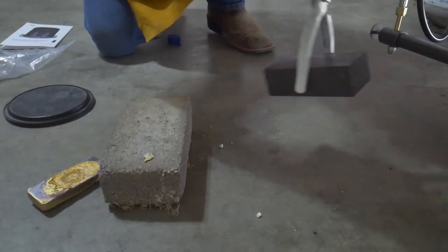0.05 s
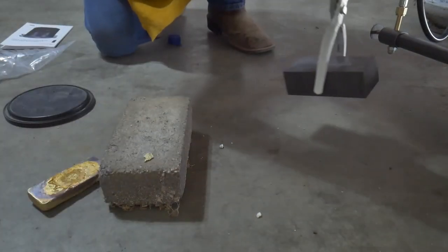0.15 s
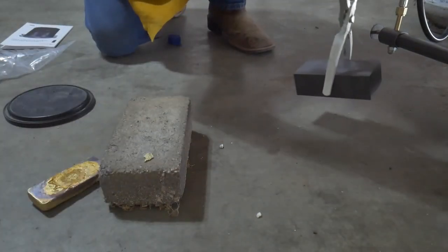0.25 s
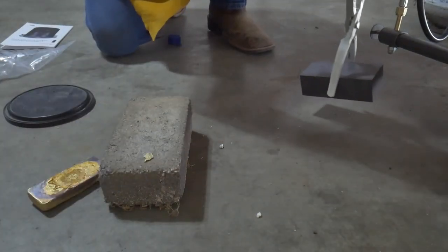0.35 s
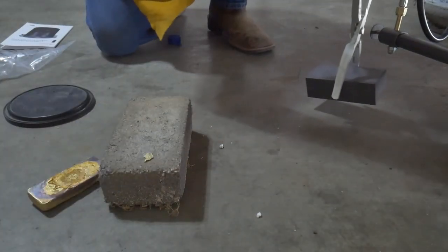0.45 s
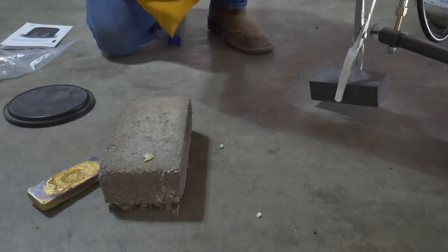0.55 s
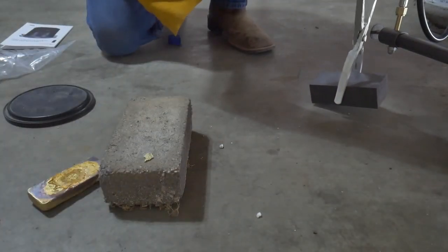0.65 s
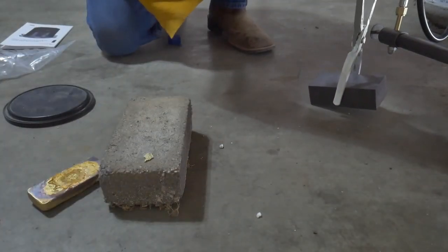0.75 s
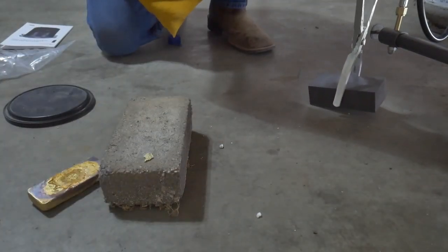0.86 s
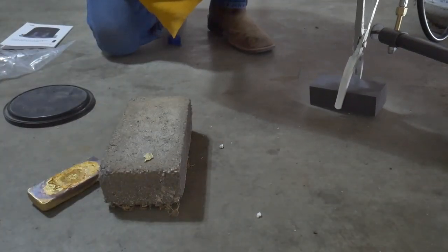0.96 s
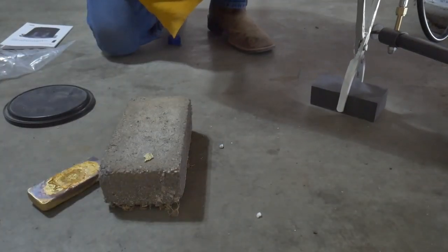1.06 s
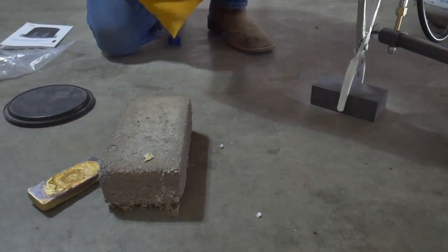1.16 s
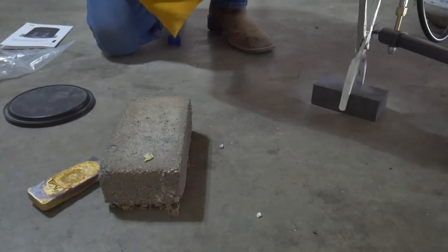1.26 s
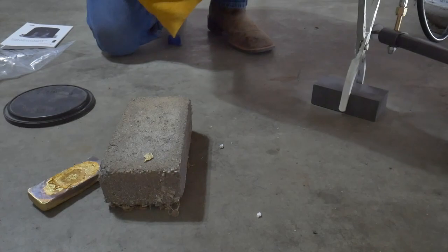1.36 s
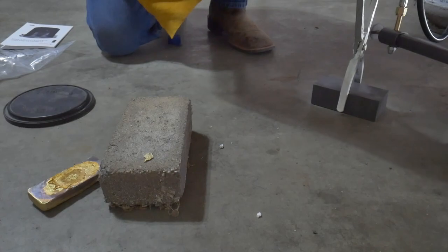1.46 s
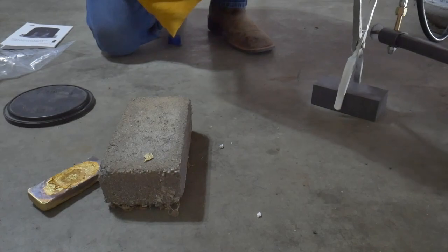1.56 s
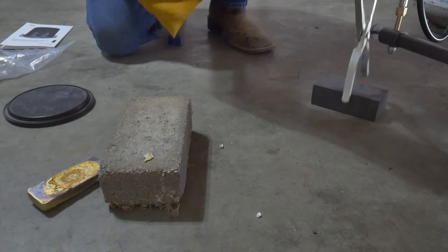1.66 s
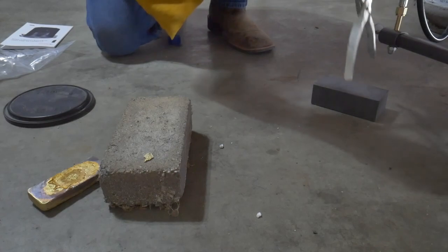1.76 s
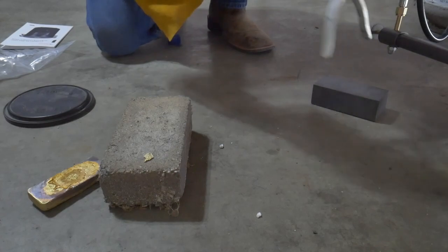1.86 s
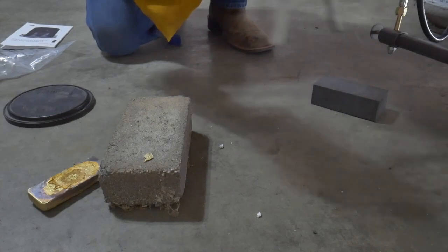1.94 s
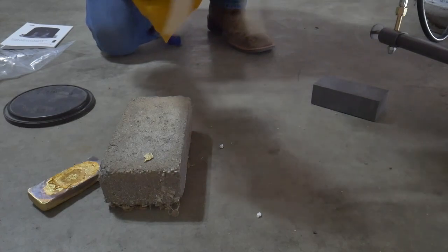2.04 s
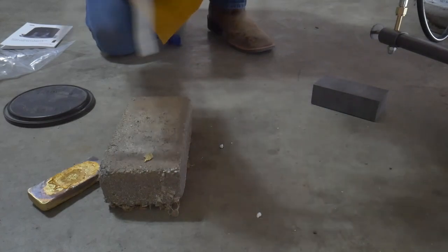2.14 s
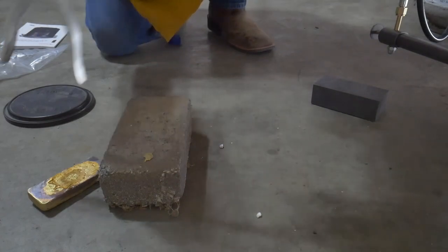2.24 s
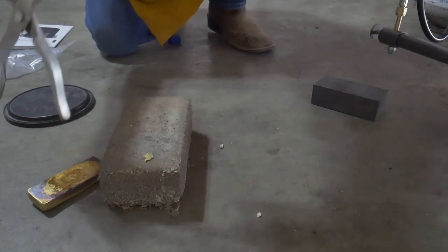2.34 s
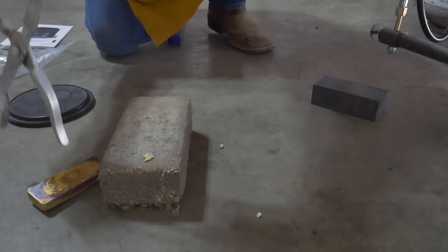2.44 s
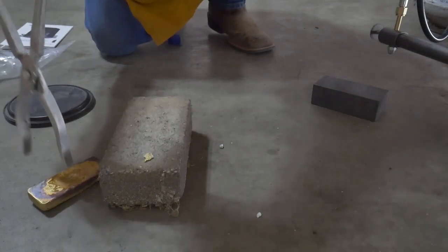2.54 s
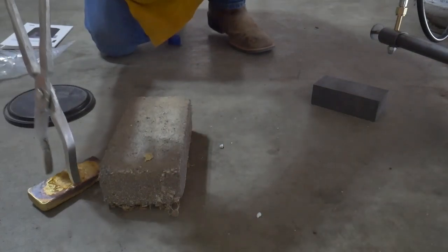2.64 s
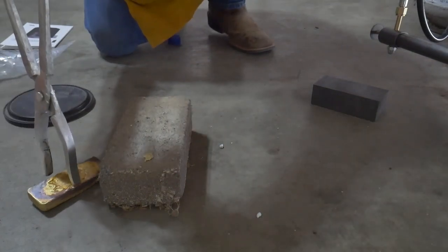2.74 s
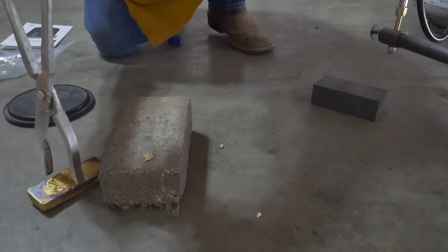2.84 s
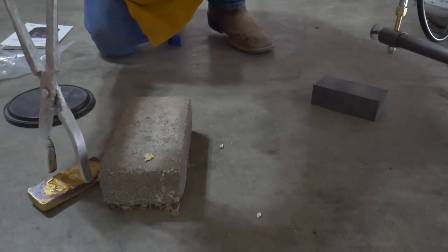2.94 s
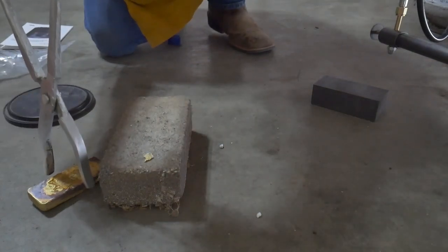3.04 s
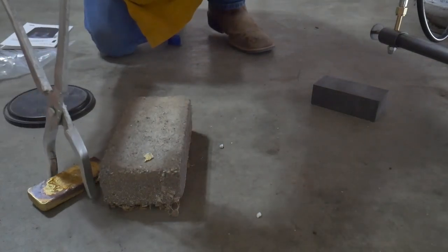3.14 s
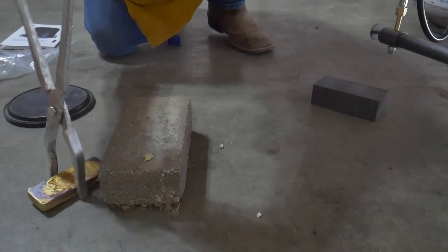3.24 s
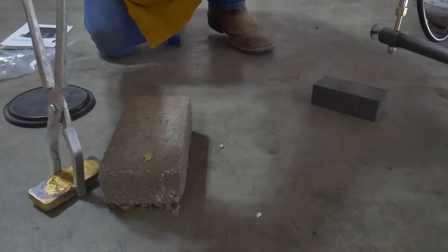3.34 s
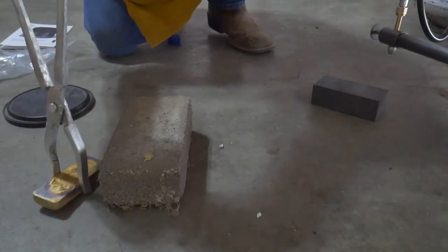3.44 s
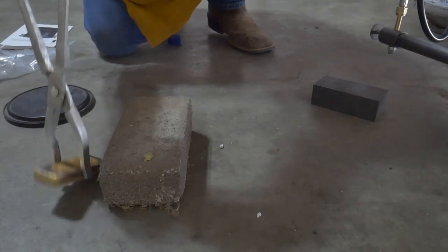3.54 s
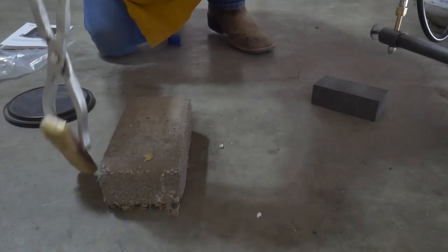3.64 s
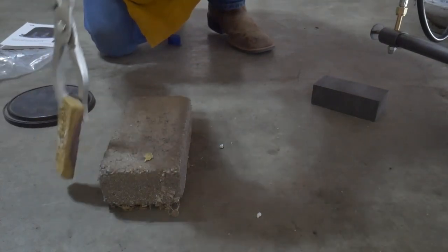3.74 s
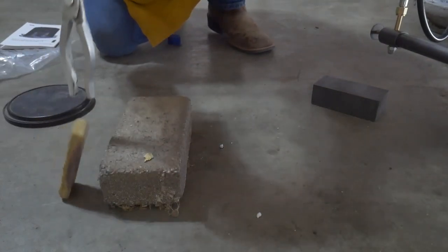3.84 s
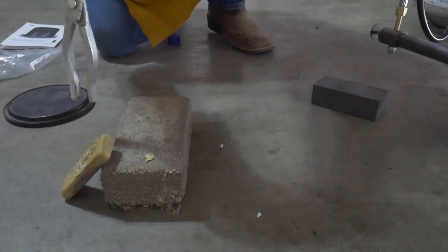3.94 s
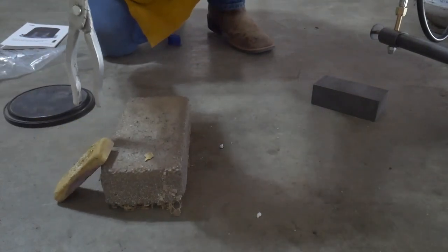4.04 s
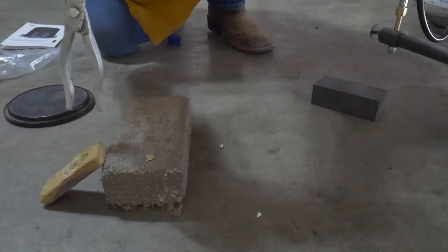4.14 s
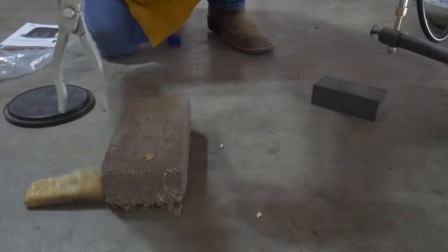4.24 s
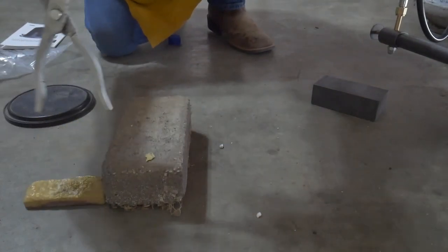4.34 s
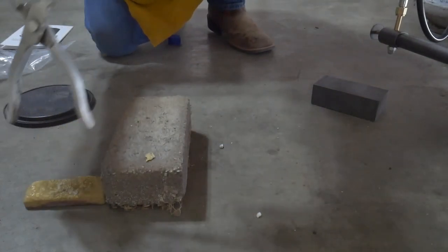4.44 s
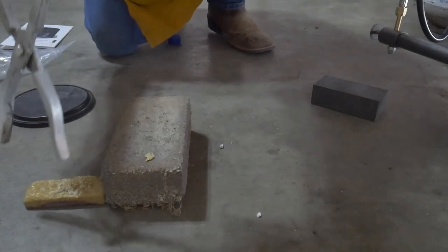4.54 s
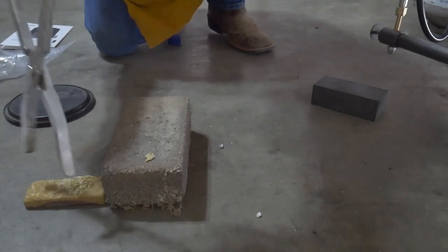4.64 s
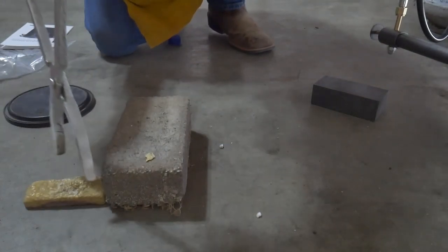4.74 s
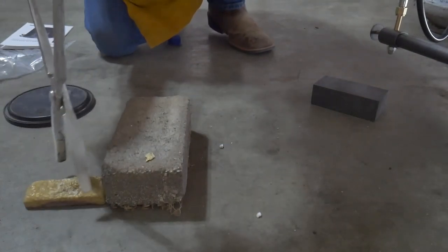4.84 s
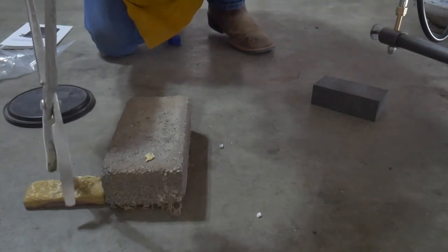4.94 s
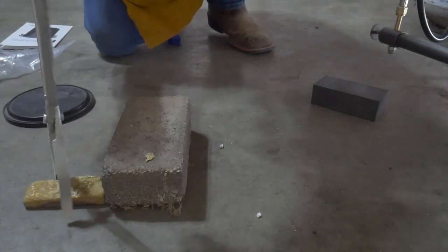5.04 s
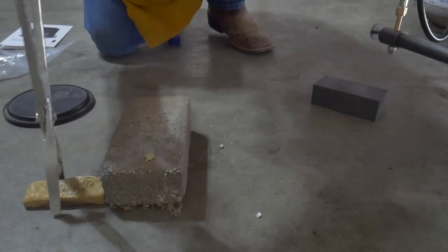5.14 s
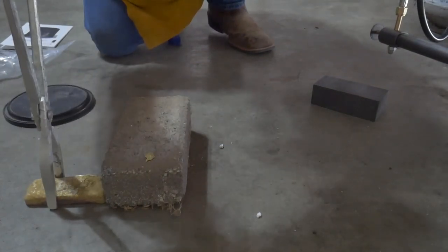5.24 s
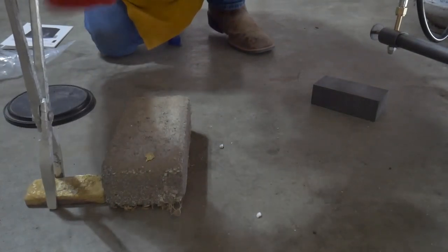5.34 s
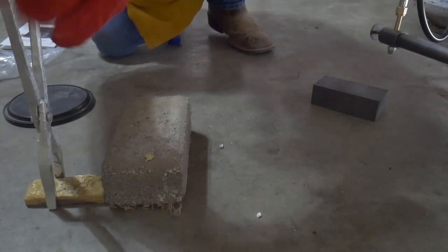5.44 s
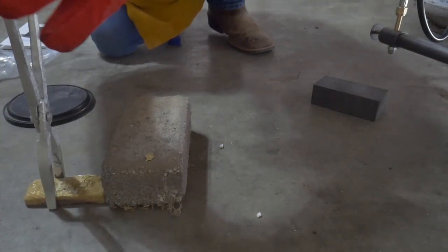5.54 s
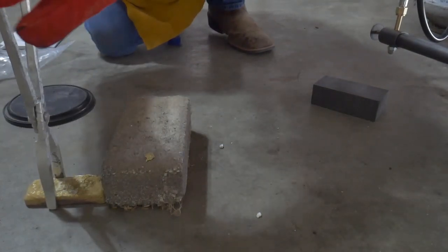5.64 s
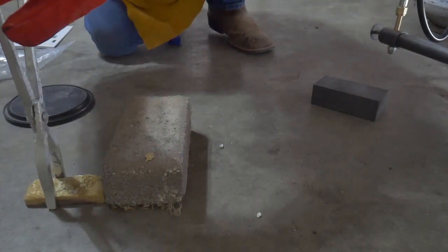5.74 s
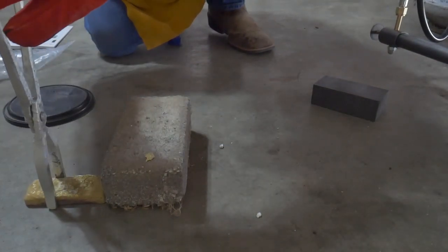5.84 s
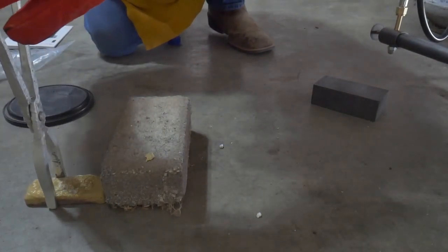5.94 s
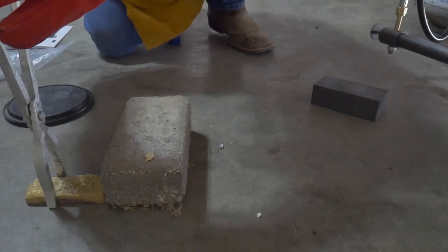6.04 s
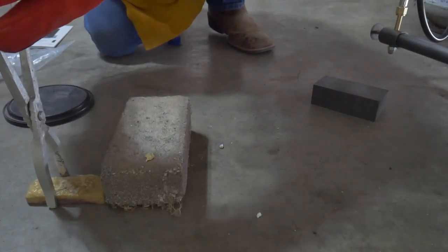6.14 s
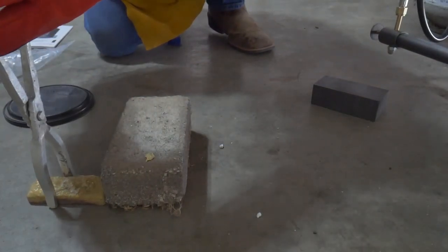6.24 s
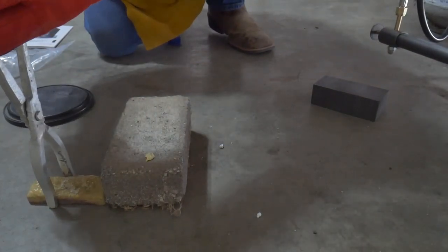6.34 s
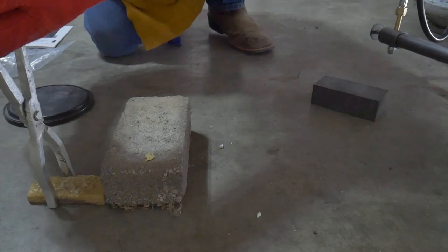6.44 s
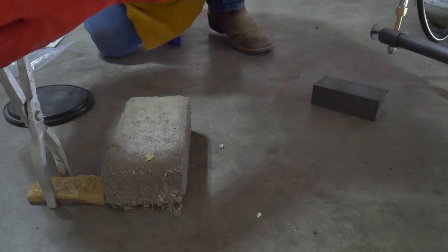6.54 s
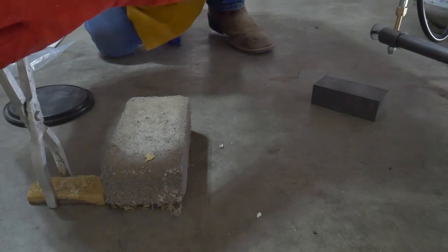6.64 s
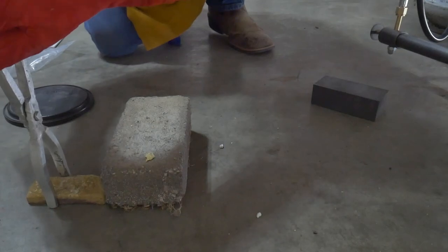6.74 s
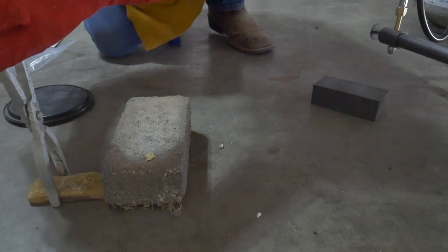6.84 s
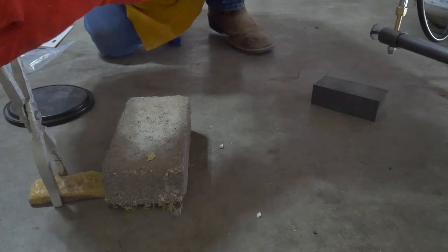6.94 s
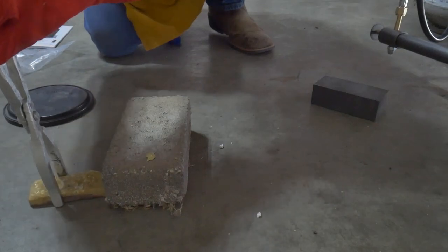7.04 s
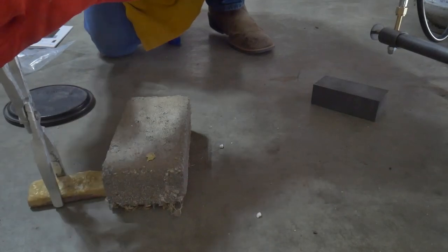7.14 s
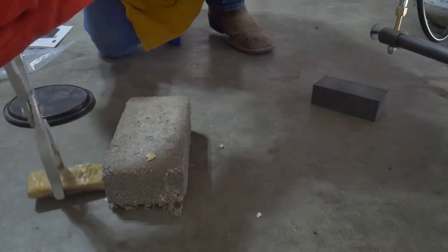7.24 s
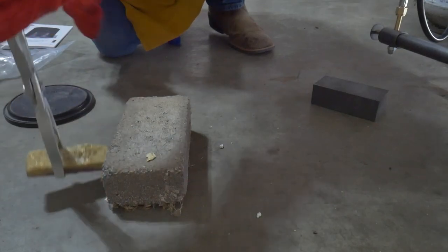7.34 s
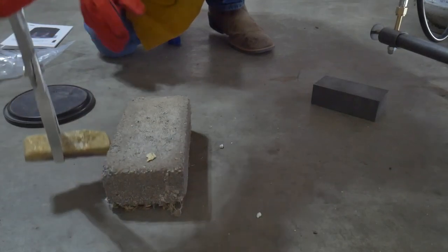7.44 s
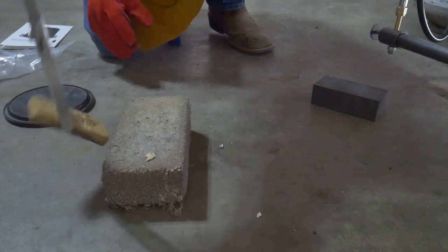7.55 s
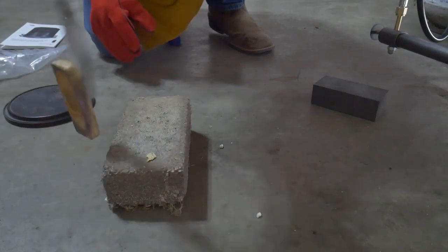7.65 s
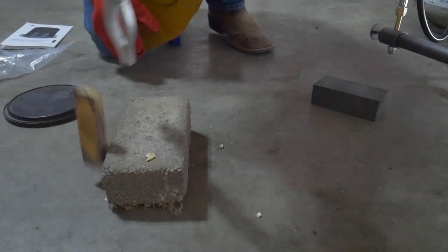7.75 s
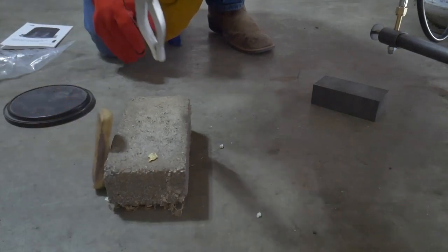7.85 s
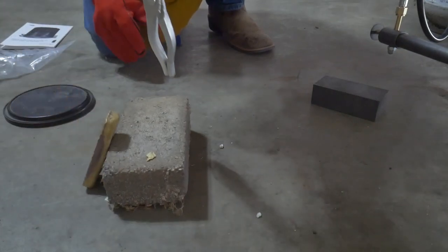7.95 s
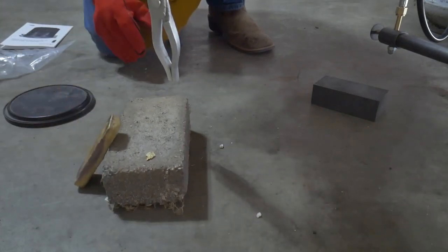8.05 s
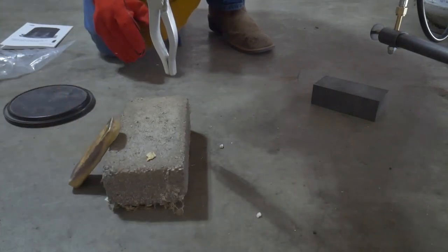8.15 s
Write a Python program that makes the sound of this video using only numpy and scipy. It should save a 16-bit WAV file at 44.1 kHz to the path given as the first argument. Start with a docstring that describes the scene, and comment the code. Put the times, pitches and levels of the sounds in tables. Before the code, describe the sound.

Quiet air rumble and faint cloth rustle, then a metal block set down on concrete: faint edge touch, solid clunk. Steel tongs snap several times around a bar, which bumps a brick dully and slaps down hard. More clacks and a short scrape, a near-quiet hold with faint ticks, then bright jaw clatter, metallic rasp and a ringing drop. Near, central sound in a reverberant concrete room.

```python
"""Tongs, block and bar in a workshop

In a workshop with a concrete floor, steel tongs set a cast metal block down, then clamp a small metal bar.
The bar is tipped against a brick, falls flat, is gripped again, rasps out of the jaws and lands ringing.
Blows mix a knock, a noisy crack and fading tones of the struck object; rubbing is noise built from tiny slips.
Sleeves rustle, grit ticks, dull bumps sound, and the hard room answers over a ventilation rumble."""
import sys
import numpy as np
from scipy import signal
from scipy.fft import rfft, irfft
from scipy.io import wavfile
from scipy.ndimage import uniform_filter1d

SR = 44100
rng = np.random.default_rng(int(sys.argv[2]) if len(sys.argv) > 2 else 0)


def transcribe(u):
    """Save the signal u as a 16-bit wav file named by the first command-line argument.

    u: samples, shape (n,) or (channels, n), limited to [-1, 1]; the rate is SR.
    q: integer samples, one column per channel.
    """
    v = np.clip(np.atleast_2d(u).T, -1, 1)
    q = np.round(v * 32767).astype(np.int16)
    wavfile.write(sys.argv[1], SR, q)


N = 361179
T = np.arange(N) / SR
LEFT_RIGHT = np.array([[1], [-1]])  # puts a sound on both sides with opposite sign


def undb(db):
    """Decibels to gain."""
    return 10 ** (np.asarray(db) / 20)


def fade(t, t60):
    """Exponential decay, 60 dB down after t60 seconds."""
    return np.exp(-np.log(1000) * t / t60)


def unit(x):
    """Scale to rms 1."""
    return x / np.sqrt(np.mean(x ** 2))


def add(track, s, sound):
    """Mix a sound into the track, starting at s seconds."""
    i = int(s * SR)
    track[i:i + len(sound)] += sound[:N - i]


def colour(x, points):
    """Shape a sound by a spectrum of (Hz, dB) points, then scale it to rms 1."""
    hz, db = np.transpose(points)
    f = np.maximum(np.fft.rfftfreq(len(x), 1 / SR), 1)
    gain = undb(np.interp(np.log(f), np.log(hz), db))
    return unit(irfft(rfft(x) * gain, len(x)))


def crack(centre_hz, t60, octaves):
    """A short burst of micro-impacts as two rough faces meet; harder contact, higher band."""
    t = np.arange(SR // 20) / SR
    f = np.maximum(np.fft.rfftfreq(len(t), 1 / SR), 1)
    away = np.log2(f / centre_hz) / octaves
    noise = irfft(rfft(rng.standard_normal(len(t))) * np.exp(-away ** 2 / 2), len(t))
    return 0.42 * unit(noise) * fade(t, t60)


def knock(hz, cycles, soft=5.9):
    """The air pulse of a mass stopped short: swings of pressure, rounded by the contact time."""
    t = np.arange(SR // 20) / SR
    band = [0.26 * hz, min(soft * hz, SR / 3)]
    contact = signal.butter(2, band, "band", fs=SR, output="sos")
    pulse = np.sin(2 * np.pi * hz * t) * fade(t, cycles / hz)
    return 1.815 * signal.sosfilt(contact, pulse)


def ring(modes, flat, held_t60):
    """Decaying tones, weighted by where the blow lands; whatever touches the object adds its own damping."""
    hz, edge_db, flat_db, free_t60 = np.transpose(modes)
    t60 = 1 / (1 / free_t60 + 1 / held_t60)
    t = np.arange(int(min(t60.max(), 1) * SR)) / SR
    db = edge_db + np.clip(flat, 0, 1) * (flat_db - edge_db)
    phase = 2 * np.pi * rng.random((len(hz), 1))
    tones = np.sin(2 * np.pi * hz[:, None] * t + phase) * fade(t, t60[:, None])
    swell = 1 - fade(t, 0.002)
    return undb(db) @ tones * swell


def strike(hits, modes, cycles, crack_t60, crack_octaves):
    """Blows on one object: rows are the direct sound and the share that goes into the room."""
    direct, sent = np.zeros((2, N))
    for s, knock_db, knock_hz, crack_db, crack_hz, ring_db, held_t60, room_db, flat in hits:
        parts = (undb(knock_db) * knock(knock_hz, cycles),
                 undb(crack_db) * crack(crack_hz, crack_t60, crack_octaves),
                 undb(ring_db) * ring(modes, flat, held_t60))
        for part in parts:
            add(direct, s, part)
            add(sent, s, undb(room_db) * part)
    return np.array([direct, sent])


def effort(strokes):
    """Each stroke of a movement swells to its fastest moment and eases off; gain over time."""
    drop_db = 21  # how far the level is down one rise time before, or one fall time after
    roundness = 1.9  # 1 = pointed, 2 = bell
    power = np.zeros(N)
    for s, db, rise, fall in strokes:
        away = np.minimum(np.maximum((s - T) / rise, (T - s) / fall), 5)
        power += undb(db - drop_db * away ** roundness) ** 2
    return np.sqrt(power)


def rub(strokes, spectrum, slips_per_s, catch_db):
    """Friction: tiny slips that catch and free every few milliseconds, as loud as the stroke is fast."""
    slips = (rng.random(N) < slips_per_s / SR) * rng.standard_normal(N)
    catch = unit(uniform_filter1d(rng.standard_normal(N), size=300))
    return colour(slips * undb(catch_db * catch), spectrum) * effort(strokes)


def bar():
    """The bar hits floor and brick, rocks and rings high; the flatter it lands, the brighter the slap."""
    # Tones of the small bar. Each row: pitch in Hz, level in dB struck on an end,
    # level in dB struck flat, free fade time (t60) in seconds.
    modes = [(4137, 0, -8, .8), (5670, -7, -9, .7), (10594, -22, -6, .7), (11965, -26, 0, .55),
             (4180, -20, -20, .5), (4700, -22, -26, .15), (8166, -42, -28, .2), (9040, -24, -12, .45),
             (15510, -42, -25, .3)]
    # Blows and rebounds. Each row: start in seconds, knock level in dB, knock pitch in Hz, crack level in dB,
    # ring level in dB, fade time (t60) in seconds the contact allows, flat share 0-1.
    blows = [(3.777, -38, 900, -29, -33, 3.3, 0.2), (3.876, -1.5, 521, -7, -15.5, 0.2, 0.21),
             (3.904, -11, 1400, -23, -18, 0.45, 0.46), (3.9984, -1.5, 900, -3, -17, 0.3, 0.1),
             (4.245, -19, 305, -48, -32, 3.6, 0), (4.3356, -10.5, 309, -0.5, -2, 0.052, 0.91),
             (4.338, -10, 1290, -18, -26, 0.9, 0.48), (7.8588, -3.5, 720, -4, -4, 0.063, 0.1),
             (7.863, -19, 1500, -40, -17.5, 4.3, 0), (7.919, -16, 470, -20, -13, 0.36, 0),
             (7.975, -11, 1350, -42, -22.5, 5.2, 0), (8.07, -14, 1230, -37, -21.5, 0.26, 0)]
    end_crack_hz, flat_crack_hz = 1250, 5600
    end_room_db, flat_room_db = -3, -8.0  # flat blows are given less room
    hits = []
    for s, knock_db, knock_hz, crack_db, ring_db, held_t60, flat in blows:
        crack_hz = end_crack_hz * (flat_crack_hz / end_crack_hz) ** flat
        room_db = end_room_db + flat * (flat_room_db - end_room_db)
        hits.append((s, knock_db, knock_hz, crack_db, crack_hz, ring_db, held_t60, room_db, flat))
    return strike(hits, modes, cycles=2.37, crack_t60=0.012, crack_octaves=0.42)


def tongs(knock_hz=1200, ring_db=-2.0, room_db=-8.5, graze_hz=5000, graze_db_per_octave=-19):
    """Clamping shakes the whole arms, a tap only the tips; the hand damps both quickly."""
    # Tones of the tongs. Each row: pitch in Hz, level in dB when a tip taps,
    # level in dB when the jaws clamp flat, free fade time (t60) in seconds.
    modes = [(243, -10, -18.5, .05), (756, -10, -12, 0.069), (1100, -21, -13.5, 0.061),
             (1406, -13.5, 0, 0.081), (1620, -13, -1.5, 0.037), (2086, -10.5, -5.5, 0.024),
             (2475, -17.5, 1.5, 0.24), (3040, -21.5, -4, .07), (3733, -15, -1, 0.27),
             (4320, -2.5, -21, 0.073), (4660, -2.5, -18, 0.06), (4990, -14, -4.5, 0.033),
             (5330, -13.5, -6.5, 0.28), (6150, -16.5, -10.5, 0.44), (6640, -11, -13, .12),
             (7930, -27.5, -12.5, 0.049), (8800, -15, 2.5, 0.36), (8600, -14, -20.5, 0.12),
             (9880, -23, -25.5, 0.11), (11370, -17.5, -14, .12), (12070, -12.5, -14, .12),
             (13400, -21.5, -21, .08), (15100, -23, -29, .1)]
    # Clacks. Each row: start in seconds, crack level in dB, crack pitch in Hz, knock level in dB,
    # fade time (t60) in seconds the hand allows, flat share 0-1.
    clacks = [(2.724, -5, 4100, -18.5, .028, 0.03), (3.213, -6, 1870, -6, 0.028, 0.56),
              (3.2143, -8.5, 10300, -28, 0.044, .3), (3.331, -25, 1500, -22, 0.046, 0.7),
              (3.337, -23, 2500, -13.5, .06, 0.67), (3.353, -5.5, 5110, -15, 0.038, 0.06),
              (5.1043, -7.5, 3450, -11, 0.019, 1), (5.107, -6, 6500, -24, .12, 0.47),
              (5.297, -15.5, 6540, -32, .03, 0.5), (5.500, -17, 10140, -18, .04, 1),
              (6.671, -38.5, 4000, -36.5, .03, 0.48), (6.927, -45, 3000, -25, .1, 0.21),
              (7.668, -46, 1700, -20, 0.026, 0.8), (7.6831, -23.5, 3170, -8, 0.019, 0.3),
              (7.7094, -8.5, 3500, -7.5, 0.074, 0.66), (7.728, -8, 9050, -29, 0.12, 0.4),
              (7.7415, -0.5, 10100, -37, .03, 0.4), (7.78, -8, 9250, -39, .06, 0.34)]
    hits = []
    for s, crack_db, crack_hz, knock_db, held_t60, flat in clacks:
        # the ring follows the crack, but a bright graze hardly rings
        octaves_above = max(np.log2(crack_hz / graze_hz), 0)
        clack_ring_db = crack_db + ring_db + graze_db_per_octave * octaves_above
        hits.append((s, knock_db, knock_hz, crack_db, crack_hz, clack_ring_db, held_t60, room_db, flat))
    return strike(hits, modes, cycles=4.6, crack_t60=0.026, crack_octaves=0.75)


def block(knock_hz=830, crack_hz=2160, room_db=-7.5):
    """The block touches down on an edge, then drops flat."""
    # Tones of the cast block. Each row: pitch in Hz, level in dB struck on an edge,
    # level in dB struck flat, free fade time (t60) in seconds.
    modes = [(810, -23, -13, 0.035), (1084, 4.5, -27, 0.11), (1605, -17, 2.5, 0.85), (1580, -17, -22, 0.35),
             (2270, -22, -6.5, 0.044), (2924, 1, -11.5, 0.31), (3710, -17, -11.5, 0.23),
             (3840, -18, -18, 0.087), (4720, -19, -18, 0.2), (5420, -13.5, -37, 0.7),
             (6540, -19, -15, 0.11), (7400, -34, -24, 0.25), (7730, -39, -29, 0.35),
             (9160, -29, -28.5, 0.32), (10400, -29, -43, 0.32), (11970, -40, -43, 0.41),
             (14500, -30, -37, 0.26)]
    # Blows. Each row: start in seconds, knock level in dB, crack level in dB, ring level in dB,
    # fade time (t60) in seconds the contact allows, flat share 0-1.
    blows = [(1.119, -18, -42, -23.5, 0.16, 0.13), (1.2525, -6, -16, -17, 1.3, 1)]
    hits = [(s, knock_db, knock_hz, crack_db, crack_hz, ring_db, held_t60, room_db, flat)
            for s, knock_db, crack_db, ring_db, held_t60, flat in blows]
    return strike(hits, modes, cycles=12.0, crack_t60=0.03, crack_octaves=0.96)


def brick(contact_t60=0.12, room_db=-2):
    """The porous brick answers a bump of the bar with a dull, very short clunk."""
    # Tones of the brick. Each row: pitch in Hz, level in dB struck on an edge,
    # level in dB struck flat, free fade time (t60) in seconds.
    modes = [(614, -5, -5.5, 0.012), (840, -3.5, 1, 0.016), (1150, -1.5, -0.5, 0.014),
             (1395, -1, -3, 0.017), (1840, -10.5, -7, 0.017)]
    # Bumps. Each row: start in seconds, level in dB, flat share 0-1.
    blows = [(3.8757, -6.5, 0.98), (3.998, -5, 0.01), (4.012, -19, 0.97), (7.8588, -11.5, 0.8)]
    direct = np.zeros(N)
    for s, db, flat in blows:
        add(direct, s, undb(db) * ring(modes, flat, contact_t60))
    return np.array([direct, undb(room_db) * direct])


def thuds():
    """Soft, dull bumps, mostly from handling of the microphone: tones that swell for a moment and die at once."""
    # Each row: start in seconds, pitch in Hz, relative level in dB, fade time (t60) in seconds.
    bumps = [(5.499, 837, -23.5, 0.031), (7.682, 105, -19, 0.075), (7.6838, 1270, -21, 0.063),
             (7.684, 536, -7.5, 0.038), (7.703, 129, -20.5, 0.066), (7.71, 307, -18, 0.015),
             (7.7187, 61, -7.5, 0.032), (7.7205, 794, -11, 0.044), (8.14, 220, -28.5, 0.13)]
    out, t = np.zeros(N), np.arange(SR // 6) / SR
    for s, hz, db, t60 in bumps:
        swell = 1 - fade(t, 0.0045)
        add(out, s, 1.3 * undb(db) * np.sin(2 * np.pi * hz * t) * fade(t, t60) * swell)
    return out


def slide():
    """Metal rasps in the jaws and over the brick: dense friction."""
    # Strokes. Each row: fastest moment in seconds, level in dB, rise in seconds, fall in seconds.
    strokes = [(3.82, -48, 0.15, .06), (7.735, -17.5, 0.028, 0.037), (7.83, -27, 0.1, 0.076)]
    # Sound colour. Each row: frequency in Hz, level in dB.
    spectrum = [(100, -42.5), (400, -12.5), (800, -3), (2500, -14), (3400, -5), (3700, 1.5), (4000, -3.5),
                (6500, -2.5), (9200, 5), (12500, -6.5), (16000, -16)]
    return rub(strokes, spectrum, slips_per_s=16000, catch_db=4)


def drag():
    """The bar's edge rocks and grinds on concrete: friction with a lower colour."""
    # Strokes. Each row: fastest moment in seconds, level in dB, rise in seconds, fall in seconds.
    strokes = [(3.79, -33.5, 0.047, 0.08), (4.02, -39, 0.089, 0.1), (4.3, -39, 0.17, 0.048),
               (5.263, -27.5, .009, 0.037), (5.925, -43, 0.088, 0.08), (6.24, -41.5, 0.075, 0.081),
               (6.94, -39, .035, 0.11)]
    # Sound colour. Each row: frequency in Hz, level in dB.
    spectrum = [(60, -23), (250, -1.5), (750, 2.5), (1500, -7), (1950, -10), (2500, -16.5), (6000, -19),
                (16000, -33)]
    return rub(strokes, spectrum, slips_per_s=9000, catch_db=2.5)


def squeaks(rise_s=0.0039, fall_s=0.037, tick_db=9, tick_hz=9300):
    """The jaws slip under the bar's weight; each slip lets go with a tick and chirps briefly."""
    # Slips. Each row: moment in seconds, level in dB.
    slips = [(6.83, -55), (6.929, -50), (6.956, -55), (7.053, -51.5), (7.113, -45), (7.126, -48),
             (7.251, -56), (7.284, -46.5), (7.49, -51), (7.536, -49.5)]
    # Narrow chirp colour. Each row: frequency in Hz, level in dB.
    spectrum = [(4000, -49), (4420, -37), (4490, 4.5), (4600, -25.5), (4730, -23), (4800, -2), (4890, -17),
                (5600, -31)]
    strokes = [(s, db, rise_s, fall_s) for s, db in slips]
    out = rub(strokes, spectrum, slips_per_s=1500, catch_db=4)
    for s, db in slips:
        add(out, s, undb(db + tick_db) * crack(tick_hz, t60=0.034, octaves=0.16))
    return out


def grit():
    """Single grains snap under metal or boot: tiny cracks in a narrow band."""
    # Each row: start in seconds, level in dB, pitch in Hz.
    grains = [(.30, -32, 12000), (0.623, -26.5, 10300), (1.499, -42, 10100), (3.735, -32.5, 3460),
              (3.764, -22, 2400), (4.199, -27, 10200), (5.94, -32.5, 10900), (6.965, -34, 12000),
              (6.985, -35, 9000), (7.614, -38, 7900)]
    out = np.zeros(N)
    for s, db, hz in grains:
        add(out, s, undb(db) * crack(hz, t60=0.011, octaves=0.36))
    return out


def sleeve():
    """Arm swings rustle sleeve and apron: cloth friction."""
    # Swings. Each row: fastest moment in seconds, level in dB, rise in seconds, fall in seconds.
    swings = [(.12, -52.5, .45, 0.47), (2.2, -57, 0.35, 0.43), (5.47, -50.5, 0.35, 0.35),
              (6.25, -62.5, 0.25, .28), (6.95, -57.5, 0.44, 0.99), (7.52, -56.5, 0.31, 0.22)]
    # Sound colour. Each row: frequency in Hz, level in dB.
    spectrum = [(880, -26), (1500, -1.5), (2160, -0.5), (4290, -4.5), (5070, -1.5), (6060, -5.5),
                (10300, -6.5), (14500, -13.5), (16000, -31.5)]
    return rub(swings, spectrum, slips_per_s=22000, catch_db=1.0)


def room(x, build_s=0.013):
    """Diffuse echoes build up as the walls answer; the treble dies first."""
    # Echo bands. Each row: frequency in Hz, fade time (t60) in seconds, relative level in dB.
    echo_bands = [(100, .8, -0.5), (400, 1, -1.5), (1250, 0.84, -3), (4000, 0.85, -1), (8000, 0.6, 0.5),
                  (15000, .35, -7.5)]
    t = np.arange(SR) / SR
    hz, t60, db = np.transpose(echo_bands)
    noise = rfft(rng.standard_normal(SR))
    log_f = np.log(np.maximum(np.fft.rfftfreq(SR, 1 / SR), 1))
    tail = np.zeros(SR)
    for k, peak in enumerate(np.eye(len(hz))):
        band = np.interp(log_f, np.log(hz), peak)  # overlaps its neighbours
        tail += undb(db[k]) * irfft(noise * band, SR) * fade(t, t60[k])
    tail *= 1 - np.exp(-(t / build_s) ** 2)
    return signal.fftconvolve(x, 0.029 * tail)[:N]


def ventilation(level_db=-42.5, hum_db=-54, side_db=-28):
    """Steady air rumble with a faint mains hum, nearly alike on both sides."""
    # Sound colour. Each row: frequency in Hz, level in dB.
    spectrum = [(10, -28.5), (22, -9), (60, -1.5), (105, -6.5), (145, -6), (240, -4), (350, -11),
                (700, -15.5), (1000, -20.5), (1800, -29), (3000, -35), (6000, -40.5), (11000, -44.5),
                (16000, -51.5)]
    mid = undb(level_db) * colour(rng.standard_normal(N), spectrum)
    side = undb(level_db) * colour(rng.standard_normal(N), spectrum)
    hum = np.sqrt(2) * np.sin(2 * np.pi * 120 * T)  # rms 1
    return mid + undb(hum_db) * hum + undb(side_db) * side * LEFT_RIGHT


def scene(copy_lag_s=.0011, copy_side_db=-31):
    """All sources are central; a faint delayed copy and the room add a trace of width."""
    direct, sent = bar() + tongs() + block() + brick()
    small = slide() + drag() + squeaks() + grit() + sleeve()
    bumps = thuds()
    sent = sent + undb(-8.0) * small + undb(-25) * bumps
    near = direct + small + bumps
    copy = np.interp(T - copy_lag_s, T, near)
    side = undb(copy_side_db) * copy + undb(-30) * room(sent)
    return near + room(sent) + side * LEFT_RIGHT + ventilation()


def record(dry, top_hz=15700):
    """Peaks beyond full scale are cut flat, then a steep filter removes the highest treble."""
    low_pass = signal.ellip(8, .2, 70, top_hz, fs=SR, output="sos")
    return signal.sosfilt(low_pass, np.clip(dry, -1, 1))


dry = scene()
out = record(dry)
transcribe(out)
```